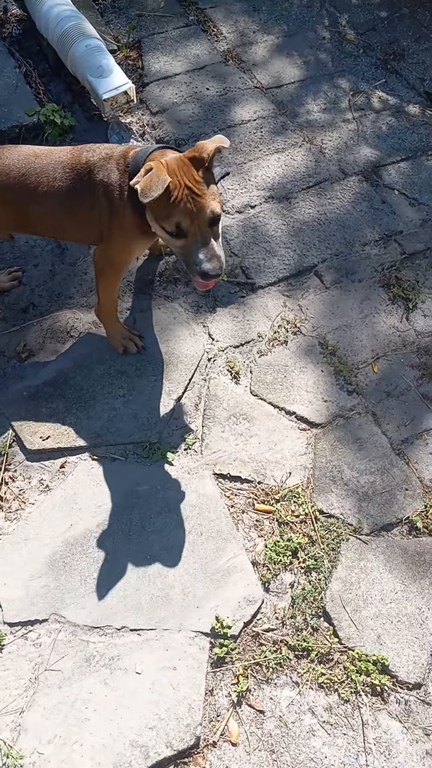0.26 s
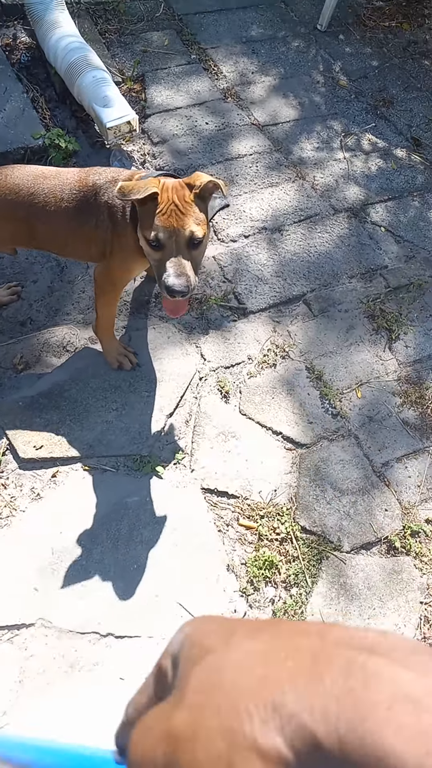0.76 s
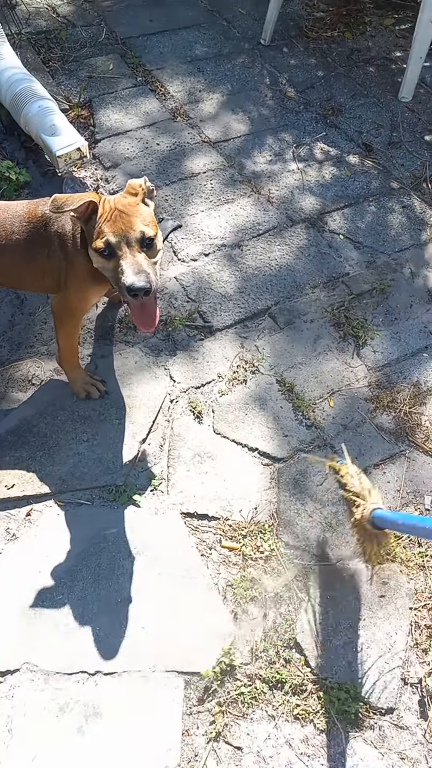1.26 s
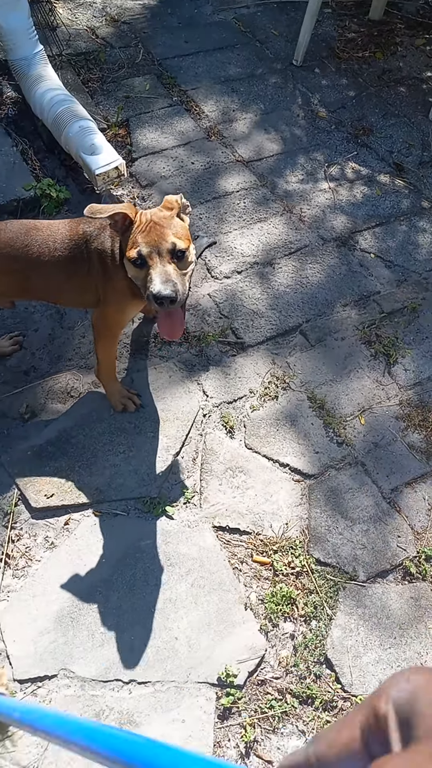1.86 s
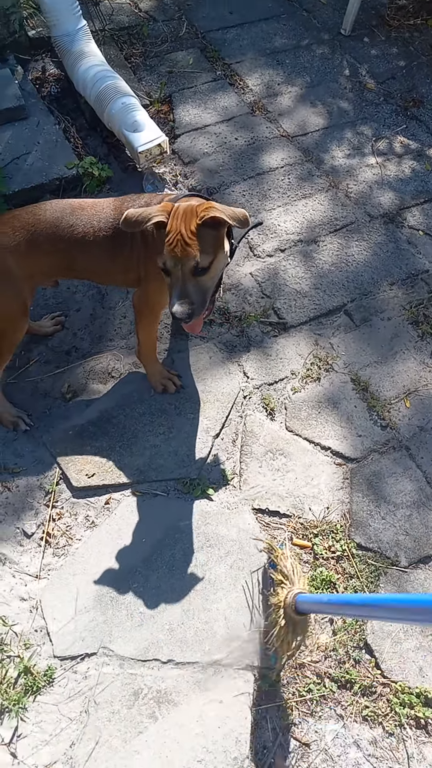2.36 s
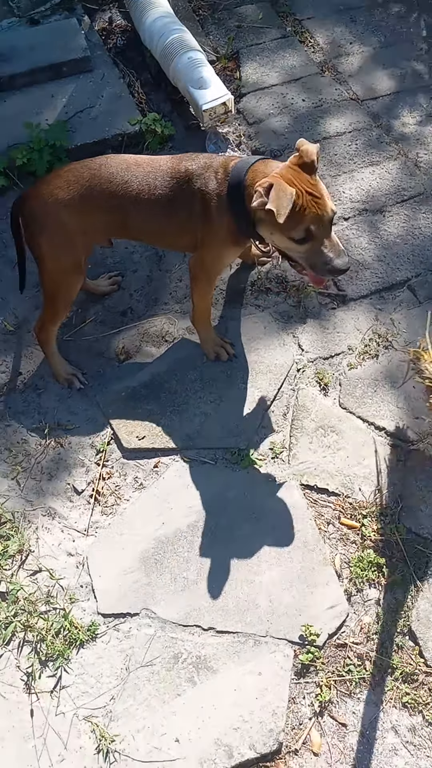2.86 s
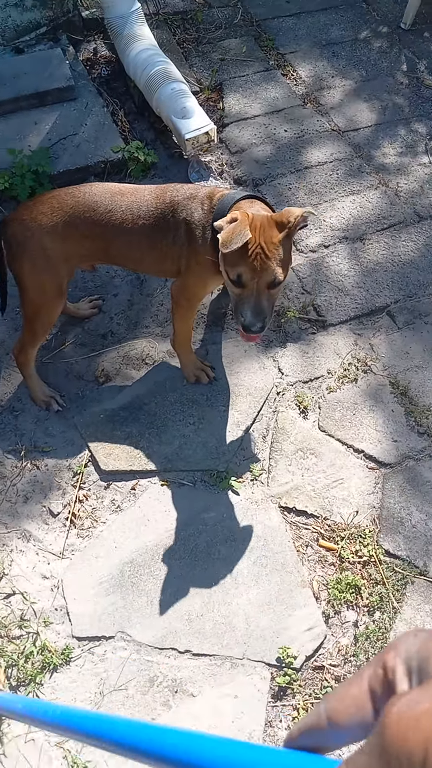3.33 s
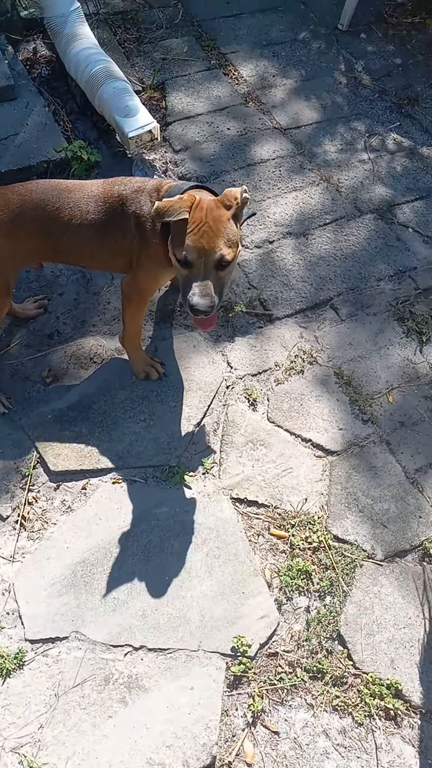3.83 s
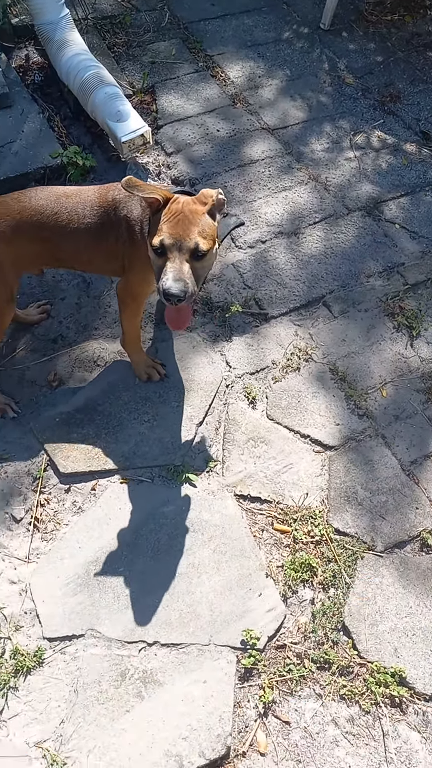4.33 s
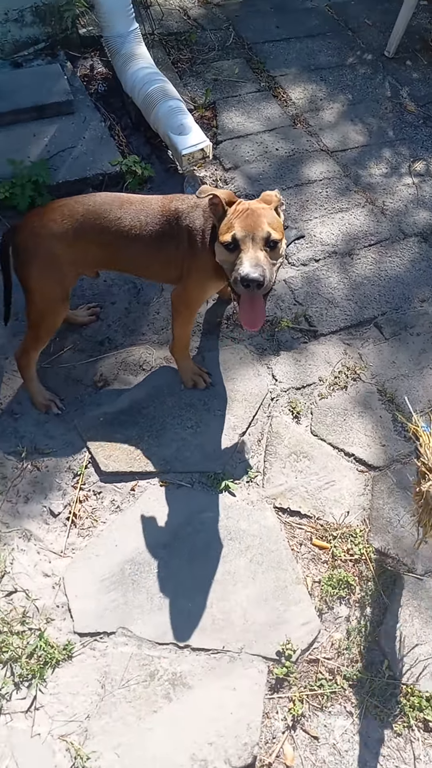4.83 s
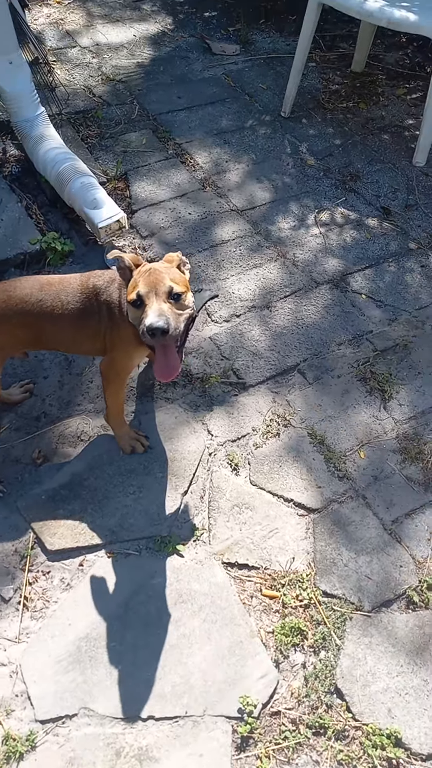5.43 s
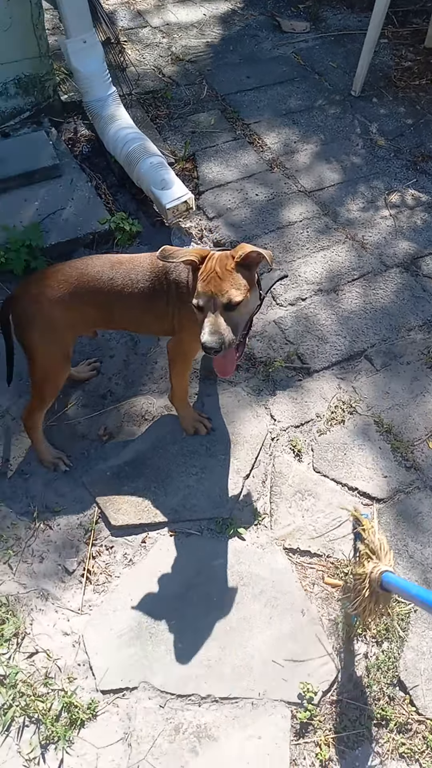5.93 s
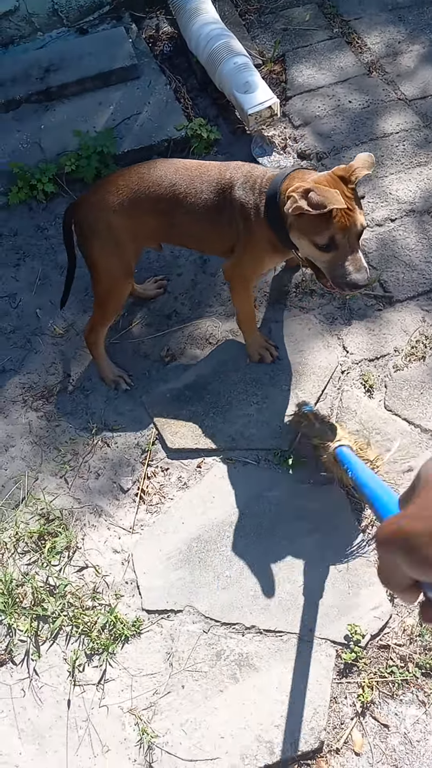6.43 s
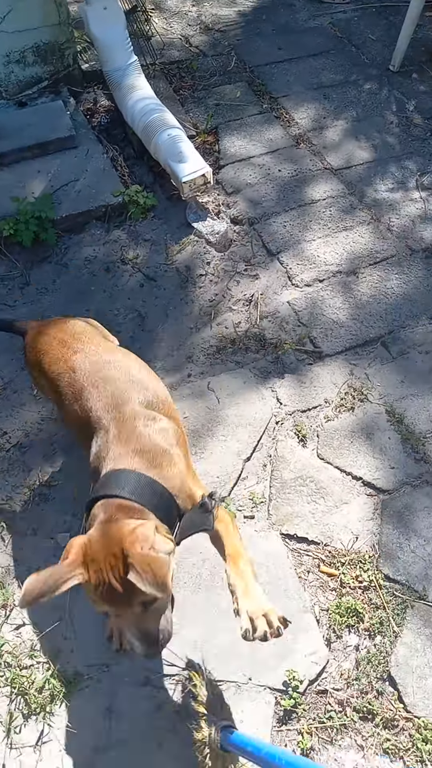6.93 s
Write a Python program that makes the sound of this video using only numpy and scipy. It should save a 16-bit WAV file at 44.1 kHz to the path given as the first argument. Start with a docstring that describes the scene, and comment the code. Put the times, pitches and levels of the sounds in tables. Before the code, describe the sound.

In a paved yard, birds chirp over a low drone of far traffic while a straw broom scratches across stone near the microphone, a little under twice a second. A car rolls by in the street beyond and fades away. Longer bird whistles follow as the sweeping continues, and finally a dog's claws click and its paws thump softly alongside one last, rougher scrape.

```python
"""A stone-paved yard with a street behind it, over a bed of distant traffic.
Up front a stiff straw broom sweeps about every 0.6 s: the tips hiss, the stalks scrape, grit flicks about.
A car passes in the street, tyres swelling and engine note sinking. Birds chirp and whistle in the trees.
At the end a dog scuffs across the stones after the broom, with clicking claws and soft paw thuds."""
import sys
import numpy as np
from scipy import signal
from scipy.fft import rfft, irfft, next_fast_len
from scipy.io import wavfile
from scipy.ndimage import uniform_filter1d

SR = 44100
rng = np.random.default_rng(int(sys.argv[2]) if len(sys.argv) > 2 else 0)


def pcm_store(signal):
    """Save signal as 16-bit PCM."""
    levels = np.round(np.clip(np.atleast_2d(signal), -1, 1) * 32767)
    wavfile.write(sys.argv[1], SR, levels.astype(np.int16).T)


N = 317079
T = np.arange(N) / SR
SIZE = next_fast_len(N)
FREQ = np.fft.rfftfreq(SIZE, 1 / SR)
STREET_LAG_S = 0.00039  # street sound reaches the left channel first


def undb(db):
    """Decibels to gain."""
    return 10 ** (np.asarray(db) / 20)


def unit(x):
    """Scale to rms 1."""
    return x / np.sqrt(np.mean(x ** 2))


def filtered(x, gains):
    """Apply a gain at every frequency."""
    return irfft(rfft(x, SIZE) * gains, SIZE)[..., :N]


def response(eq):
    """Gain at every frequency from (frequency [Hz], level [dB]) points."""
    hz, db = np.transpose(eq)
    return undb(np.interp(np.log(FREQ + 1), np.log(hz), db))


def colour(x, eq):
    """Shape a signal with an EQ curve, at rms 1."""
    return unit(filtered(x, response(eq)))


def walk(per_s):
    """Smooth random modulation with a spread near 1."""
    knots = rng.standard_normal(8192)
    return 1.2 * np.interp(T * per_s, np.arange(len(knots)), knots)


def stereo(three, share, lag_s):
    """Stereo image from three signals: one common and late on the right, one diffuse for each side."""
    late = filtered(three[0], np.exp(-2j * np.pi * FREQ * lag_s))
    return np.sqrt(share) * np.array([three[0], late]) + np.sqrt(1 - share) * three[1:]


def noise(share, lag_s):
    """Stereo white noise; a larger common share narrows the image."""
    return stereo(rng.standard_normal((3, N)), share, lag_s)


def crackle(per_s, spread_db, share, lag_s):
    """Stereo stream of tiny random clicks of uneven size."""
    size = undb(spread_db * np.minimum(rng.exponential(size=(3, N)), 5))
    fires = rng.random((3, N)) < per_s / SR
    return stereo(unit(fires * size * rng.standard_normal((3, N))), share, lag_s)


def rough_hum(cycles, waver_per_s):
    """A tone that wanders in level and phase, at rms 1."""
    waver = walk(waver_per_s) + 1j * walk(waver_per_s)
    return unit(np.real(np.exp(2j * np.pi * cycles) * waver))


def strike(start, decay_s):
    """Envelope with an instant attack and an exponential decay."""
    return (T >= start) * np.exp(-np.abs(T - start) / decay_s)


def yard_reverb(x, t60_s, wet_db, predelay_s):
    """Scattered echoes from walls, fence and trees, wet only."""
    t = T[:SR]
    tail = rng.standard_normal((2, SR)) * np.exp(-np.log(1000) * t / t60_s) * (t > predelay_s)
    tail /= np.sqrt(np.sum(tail ** 2, axis=1, keepdims=True))
    return undb(wet_db) * signal.fftconvolve(x[None], tail, axes=1)[:, :N]


# Fader ride of the far engines' drone: (time [s], level [dB])
DRONE_RIDE = [(0.07, -38.5), (.17, -33), (.52, -42), (.63, -30), (1.02, -39), (1.22, -33.5), (1.6, -38.5),
              (2.3, -31), (2.8, -38), (3.1, -32.5), (3.7, -35), (4.0, -42), (4.52, -45.5), (4.59, -36.5),
              (5.02, -43), (5.5, -40.5), (6.7, -40.5), (7.19, -35)]
# EQs of the bass drone, road rumble, tyre hiss and outdoor air: (frequency [Hz], level [dB])
DRONE_EQ = [(20, -34), (40, -25), (60, -9), (72, 1), (81, 6), (95, -0.5), (120, -12), (160, -20),
            (300, -67.5)]
RUMBLE_EQ = [(40, -31), (90, 0.5), (140, 1), (210, 1.5), (265, -5), (325, -5), (390, -13), (500, -20),
             (900, -55)]
TYRE_HISS_EQ = [(400, -7.5), (1000, 7), (1400, 4), (1800, -2), (2500, -8), (3600, -16.5), (5500, -31),
                (9000, -32), (16000, -48)]
AIR_EQ = [(500, 12.5), (1500, 11), (2700, 0.5), (4200, -4.5), (5600, -21.5), (9000, -18), (16000, -38)]


def distant_traffic():
    """The bed: far engines throb and hum, and far roads rumble under a faint outdoor hiss."""
    drone = colour(noise(share=0.98, lag_s=0.0001), DRONE_EQ)
    drone_rms = np.sqrt(uniform_filter1d(np.mean(drone ** 2, axis=0), SR // 12))
    beating_db = 2.5 * walk(11)  # the engines beat against each other
    throb = drone / drone_rms * undb(np.interp(T, *np.transpose(DRONE_RIDE)) + beating_db)
    fade_in = np.clip((T - 5.1) / 0.088, 0, 1)  # one more engine joins late
    hum = undb(-48.5) * rough_hum(120.3 * T, waver_per_s=25) * fade_in
    rumble = undb(-51 + 0.72 * walk(14)) * colour(noise(share=0.88, lag_s=0.000303), RUMBLE_EQ)
    roads = undb(-57 + 0.27 * walk(10)) * colour(noise(share=0.3, lag_s=STREET_LAG_S), TYRE_HISS_EQ)
    air = undb(-56 + 0.59 * walk(2.26)) * colour(noise(share=0.074, lag_s=STREET_LAG_S), AIR_EQ)
    return throb + hum + rumble + roads + air


# Fader ride of the passing tyres: (time [s], tread roar [dB], hiss [dB])
TYRE_RIDE = [(0.3, -58.5, -57), (1.5, -50.5, -48), (2, -44.5, -45), (2.48, -39.5, -44), (2.9, -45.5, -48.5),
             (3.3, -44.5, -46.5), (3.75, -42, -44.5), (4.1, -50.5, -54.5), (5.2, -60.5, -84)]
# EQs of the midrange tread roar and its top-end fizz: (frequency [Hz], level [dB])
TREAD_EQ = [(300, -12.5), (520, -9.5), (620, -1), (760, 2), (880, 4.5), (970, 0.5), (1100, -11.5),
            (2000, -46)]
FIZZ_EQ = [(3500, -12), (6000, 18), (8000, 8), (12000, -6), (16000, -13)]


def tyres():
    """Tread rolling on the road: a roar and a hiss that swell and fade with the pass-by."""
    times, *levels = np.transpose(TYRE_RIDE)
    tread_db, hiss_db = (np.interp(T, times, db) for db in levels)
    tread = colour(noise(share=0.58, lag_s=STREET_LAG_S), TREAD_EQ) * undb(tread_db + 1.28 * walk(24))
    hiss = colour(noise(share=0.61, lag_s=STREET_LAG_S), TYRE_HISS_EQ) * undb(hiss_db + 1.26 * walk(10))
    fizz = colour(noise(share=0.36, lag_s=STREET_LAG_S), FIZZ_EQ) * undb(tread_db - 33)
    return tread + hiss + fizz


CLOSEST_AT_S, SPEED_M_S, STREET_M = 2.95, 14, 14
OPEN_FROM_S, OPEN_UNTIL_S, EDGE_S = 1.647, 3.947, 0.1  # the car crosses a gap between two buildings
# The engine sinks to a low boom as the driver eases off: (time [s], firing rate [Hz], exhaust [dB])
ENGINE_RIDE = [(0.6, 70.5, -25.5), (1.3, 71.9, -31.5), (1.85, 67.5, -24), (2.5, 67.86, -30.5),
               (2.95, 65.86, -26), (3.25, 61.18, -24.5), (3.7, 61.05, -26.5), (5.2, 61.5, -34.5)]


def car():
    """Pass-by on a straight street: exhaust note and tyre hum Doppler down over the body's rumble."""
    along_m = SPEED_M_S * (T - CLOSEST_AT_S)
    distance_m = np.hypot(along_m, STREET_M)
    bearing = along_m / distance_m
    doppler = 1 / (1 + SPEED_M_S * bearing / 343)
    hidden = 1 - (np.tanh((T - OPEN_FROM_S) / EDGE_S) - np.tanh((T - OPEN_UNTIL_S) / EDGE_S)) / 2

    def pass_by(db, hidden_db, lengthwise_db, ahead_db):
        """Gain from distance, shielding by buildings and the direction a part radiates in."""
        aim_db = lengthwise_db * bearing ** 2 - ahead_db * bearing
        return STREET_M / distance_m * undb(db + hidden_db * hidden + aim_db)

    times, firing_hz, exhaust_db = np.transpose(ENGINE_RIDE)
    pitch_hz = np.interp(T, times, firing_hz) * doppler * (1 + 0.01286 * walk(14))
    phase = 2 * np.pi * np.cumsum(pitch_hz) / SR
    exhaust = np.sin(phase) + undb(-20.5) * np.sin(2 * phase) + undb(-25.5) * np.sin(3 * phase)
    exhaust *= undb(2.9 * walk(17))
    exhaust *= pass_by(db=np.interp(T, times, exhaust_db), hidden_db=-6, lengthwise_db=0.1, ahead_db=2)
    tyre_hum = rough_hum(np.cumsum(329.7 * doppler) / SR, waver_per_s=60)
    tyre_hum *= pass_by(db=-51, hidden_db=-21.5, lengthwise_db=19, ahead_db=-1.1)
    rumble = colour(noise(share=0.97, lag_s=0.000346), RUMBLE_EQ) * undb(0.35 * walk(14))
    rumble *= pass_by(db=-38, hidden_db=-3, lengthwise_db=-5.5, ahead_db=3)
    return exhaust + tyre_hum + rumble + tyres()


def syrinx(hz, gain, waver, octave_db):
    """A bird's voice: a nearly pure tone with pitch tremble, level flutter and a faint octave."""
    phase = 2 * np.pi * np.cumsum(hz * (1 + waver * walk(420))) / SR
    octave = undb(octave_db) * np.clip((hz - 3000) / 1000, 0, 1)  # only high notes carry it
    return gain * undb(3.5 * walk(90)) * (np.sin(phase) + octave * np.sin(2 * phase))


def slur(start, length, first_hz, last_hz, db, bend):
    """Pitch and gain of one short note that glides fast and then levels off."""
    progress = np.clip((T - start) / length, 0, 1)
    hz = last_hz + (first_hz - last_hz) * (1 - progress) ** bend
    return hz, undb(db) * np.sqrt(4 * progress * (1 - progress))


# Chirp cues: (time [s], length [s], first pitch [Hz], last pitch [Hz], level [dB])
CHIRP_CUES = [(0.387, 0.067, 4560, 3130, -55), (0.432, 0.04, 4100, 4880, -50),
              (0.443, 0.057, 4700, 3870, -51), (0.788, 0.049, 4080, 3126, -47),
              (0.842, 0.028, 4830, 3730, -50.5), (0.981, 0.043, 3700, 3320, -49),
              (1.495, 0.039, 3610, 2730, -43.5), (1.562, 0.022, 4600, 3860, -45),
              (1.657, 0.055, 3440, 3000, -47.5), (1.737, 0.025, 4690, 4170, -41),
              (1.883, 0.041, 4140, 2890, -40), (1.949, 0.022, 4200, 3700, -41),
              (2.383, 0.072, 3700, 3070, -44), (2.516, 0.094, 4415, 2980, -41),
              (2.688, 0.058, 4176, 2823, -41.5), (3.147, 0.063, 4620, 4500, -51),
              (3.195, 0.048, 4400, 3240, -47), (3.325, 0.068, 4020, 3670, -48),
              (3.384, 0.055, 3710, 2860, -44), (3.48, 0.043, 3720, 3980, -48)]


def chirping_bird():
    """Quick slurred chirps, raspier on the high notes; moving leaves blur the pitch of their tail."""
    notes = [slur(*cue, bend=1.5) for cue in CHIRP_CUES]
    chirps = sum(syrinx(hz, gain, waver=0.018 * (hz / 3500) ** 2.4, octave_db=-26) for hz, gain in notes)
    blurred = sum(syrinx(hz, gain, waver=0.04, octave_db=-18) for hz, gain in notes)
    early = yard_reverb(chirps, t60_s=0.07, wet_db=-2, predelay_s=0.0017)
    tail = yard_reverb(blurred, t60_s=0.7, wet_db=-4, predelay_s=0.02)
    return undb(-5.5) * chirps + early + tail


def swoop(dive_at, lead_s, bottom_s, climb_s, high_hz, low_hz, back_hz, db, swell_db):
    """Pitch and gain of one whistle: a sagging high note, a dive to a loud low note, a climb back up."""
    sag_hz_per_s, climb_hz_per_s = 7300, 5000
    dive_s, fade_s, accent_lag_s, accent_s = 0.0097, 0.02, 0.021, 0.016
    accent_db_per_octave, tilt_db_per_octave = 11.5, -7
    t = T - dive_at
    octaves = np.log2(high_hz / low_hz)  # deeper dives land harder and spring back faster
    down = np.exp(-np.maximum(t, 0) / dive_s)
    up = np.exp(-np.maximum(bottom_s - t, 0) * octaves / 0.011)
    drift = sag_hz_per_s * np.clip(-t, 0, lead_s) + climb_hz_per_s * np.clip(t - bottom_s, 0, climb_s)
    hz = low_hz + (high_hz - low_hz) * down + (back_hz - low_hz) * up + drift
    accent = np.exp(-((t - accent_lag_s) / accent_s) ** 2)
    gate = np.clip(np.minimum(t + lead_s, bottom_s + climb_s - t) / fade_s + 0.5, 0, 1)
    effort_db = db + swell_db * np.clip(t / bottom_s, 0, 1) + accent_db_per_octave * octaves * accent
    return hz, gate * undb(effort_db + tilt_db_per_octave * np.log2(hz / low_hz))


# Whistle cues: (dive time [s], lead-in [s], bottom hold [s], climb [s],
# top pitch [Hz], bottom pitch [Hz], return pitch [Hz], level [dB], swell over the hold [dB])
WHISTLE_CUES = [(4.273, .005, .215, 0.041, 4656, 3730, 4222, -56, 9),
                (5.569, 0.05, 0.16, 0.068, 4350, 2496, 4030, -42, -2.5),
                (6.172, 0.0435, 0.19, .1, 3674, 2428, 4105, -41, -1.5),
                (7.024, 0.0042, .175, .012, 3800, 2560, 3660, -42, -3.5)]
# Pips, flat or flicked down: (time [s], length [s], first pitch [Hz], last pitch [Hz], level [dB])
PIP_CUES = [(5.498, 0.027, 3590, 3595, -46), (5.794, 0.036, 3980, 2540, -37),
            (6.448, .05, 4750, 3720, -43.5), (6.978, .045, 3680, 3700, -37.5)]


def whistling_bird():
    """A second bird swoops through long whistles and short pips that ring around the yard."""
    notes = [swoop(*cue) for cue in WHISTLE_CUES] + [slur(*cue, bend=2.6) for cue in PIP_CUES]
    whistles = sum(syrinx(hz, gain, waver=0.012, octave_db=-23) for hz, gain in notes)
    early = yard_reverb(whistles, t60_s=0.15, wet_db=-3.5, predelay_s=0.003)
    tail = yard_reverb(whistles, t60_s=0.57, wet_db=-8.5, predelay_s=0.047)
    return undb(-5.5) * whistles + early + tail


# Soft knocks: (time [s], level [dB], decay [s])
THUD_CUES = [(5.105, -37, 0.045), (6.993, -29, 0.014), (7.047, -43, 0.02), (7.135, -33, 0.016)]
# EQ of their dull body: (frequency [Hz], level [dB])
THUD_EQ = [(60, -40), (130, 8.5), (200, -5), (300, -0.5), (420, -17.5), (1000, -21), (3000, -50),
           (8000, -61)]


def thuds():
    """Paws and broom head land on the pavers, padded and without a ring."""
    blows = sum(undb(db) * strike(start, decay_s) for start, db, decay_s in THUD_CUES)
    padded = uniform_filter1d(blows, SR // 200)  # soft contact rounds off the attack
    return padded * colour(noise(share=0.98, lag_s=0.00005), THUD_EQ)


# Spot ticks and scuffs: (time [s], level [dB], band pitch [Hz], decay [s])
TICK_CUES = [(.888, -47, 13000, 0.0011), (1.246, -41, 7000, 0.00088), (1.594, -49, 12000, 0.0016),
             (3.162, -39, 12300, .002), (5.919, -35, 2980, 0.0014), (6.533, -42.5, 2980, 0.0044),
             (6.809, -48.5, 3000, 0.012), (6.821, -41, 12000, 0.0066), (6.827, -49.5, 2210, 0.045),
             (6.914, -53, 6100, 0.015), (6.945, -44, 3400, 0.019), (7.04, -42.5, 1300, 0.02),
             (7.136, -52.5, 6000, 0.0055)]


def grit_and_claws():
    """Grit, straw ends and claws strike the stone in short, broad snaps."""
    snaps = np.zeros((2, N))
    hiss = noise(share=0.26, lag_s=0.00005)
    for start, db, hz, decay_s in TICK_CUES:
        band = signal.butter(1, [hz * 0.6, min(hz * 1.24, 0.45 * SR)], "bandpass", fs=SR, output="sos")
        makeup = np.sqrt(SR / 2 / hz)  # narrower bands pass less noise
        snaps += undb(db + 2.5) * makeup * signal.sosfilt(band, hiss * strike(start, decay_s) + 1e-18)
    return snaps


# Broom strokes: (time of peak pressure [s], swing down [s], lift off [s],
# tip hiss [dB], scrape relative to hiss [dB], rustle after the lift [dB])
STROKE_CUES = [(.003, .075, 0.1, -39.5, -4.5, -74), (0.652, 0.062, 0.15, -40.5, -2, -70),
               (1.149, 0.096, 0.1, -44.5, -6, -58.5), (2.348, 0.037, 0.1, -40, -8.5, -58.5),
               (3.027, 0.08, 0.1, -41, -3.5, -61), (3.521, 0.056, 0.12, -43, -0.5, -73.5),
               (4.21, 0.071, 0.043, -49.5, -9, -68), (4.673, 0.044, 0.1, -40, -6, -69.5),
               (5.327, 0.095, 0.089, -43.5, -6.5, -75), (5.806, 0.038, 0.15, -42.5, -9.5, -68.5),
               (6.493, 0.092, 0.13, -44, -3, -63.5), (7.045, 0.18, 0.067, -52, 4.5, -56.5)]
# EQs of the bright tip hiss and the lower stalk scrape: (frequency [Hz], level [dB])
BRISTLE_EQ = [(2000, -8), (3500, 0), (5300, -4.5), (8400, -1.5), (10600, 2.5), (13000, 1.5), (15500, 0.5)]
SCRAPE_EQ = [(300, -7), (700, -6.5), (1200, -5), (1800, -3), (2500, -1), (3500, -2), (4600, -5),
             (6500, -14.5)]


def sand():
    """Grains flicked up by each stroke patter back onto the stone."""
    falling = sum(strike(peak + lift_s, decay_s=0.25) for peak, _, lift_s, *_ in STROKE_CUES)
    grains = colour(crackle(per_s=45, spread_db=4, share=0.38, lag_s=0.0001), BRISTLE_EQ)
    return undb(-75.5) * falling * grains


def broom():
    """Hundreds of straws catch and slip on rough stone: tips hiss, and stalks scrape when pressed."""
    tips, stalks, loose = np.zeros((3, N))
    for peak, swing_s, lift_s, db, scrape_db, rustle_db in STROKE_CUES:
        pressure = np.sin(np.interp(T - peak, [-swing_s, 0, lift_s], [0, np.pi / 2, 0]))
        tips += undb(db) * pressure ** 1.64
        stalks += undb(db + scrape_db) * pressure ** 2
        loose += undb(db - 10) * uniform_filter1d(pressure, SR // 22)  # strays touch first, leave last
        loose += undb(rustle_db) * strike(peak + lift_s, decay_s=0.19)  # straws spring back
    judder = undb(0.72 * walk(170) + 1.16 * walk(50))  # tufts catch on the pitted surface
    hiss = colour(crackle(per_s=22000, spread_db=2, share=0.23, lag_s=0.000158), BRISTLE_EQ)
    scrape = colour(crackle(per_s=8000, spread_db=1.5, share=0.26, lag_s=0.0001), SCRAPE_EQ)
    rustle = colour(crackle(per_s=1800, spread_db=-2, share=0.33, lag_s=0.00016), BRISTLE_EQ)
    sweep = judder * (undb(3.5) * tips * hiss + undb(1) * stalks * scrape) + undb(1) * loose * rustle
    return sweep * undb([[1.2], [-1.2]])  # panned a little left


def scene():
    """The mix: street at the back, birds around the yard, broom and dog up front with light reverb."""
    foley = broom() + grit_and_claws() + sand() + thuds()
    reverb = yard_reverb(foley[0], t60_s=0.35, wet_db=-18.5, predelay_s=0.015)
    return distant_traffic() + car() + chirping_bird() + whistling_bird() + foley + reverb


# Stereo balance across the spectrum: (frequency [Hz], left minus right [dB])
BALANCE_EQ = [(60, -3), (130, -0.5), (330, -6), (650, 0), (1200, -3), (2400, -9.5), (4400, -2.5),
              (8000, -3.5), (14000, 2.5)]


def record(dry):
    """Master chain: opposite EQ on left and right, then a steep high cut."""
    lean = np.sqrt(response(BALANCE_EQ))
    balanced = filtered(dry, np.array([lean, 1 / lean]))
    high_cut = signal.ellip(10, 0.2, 80, 15900, fs=SR, output="sos")
    return signal.sosfilt(high_cut, balanced)


dry = scene()
out = record(dry)
pcm_store(out)
```